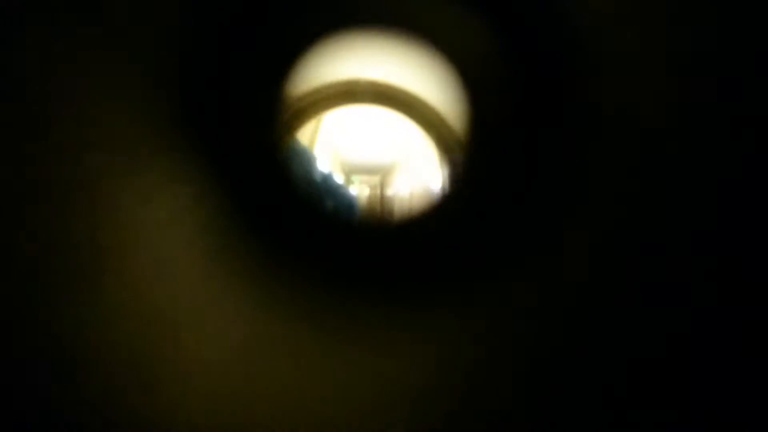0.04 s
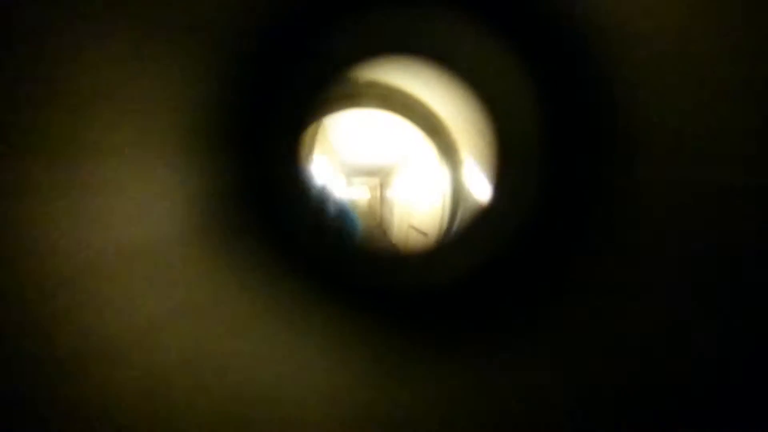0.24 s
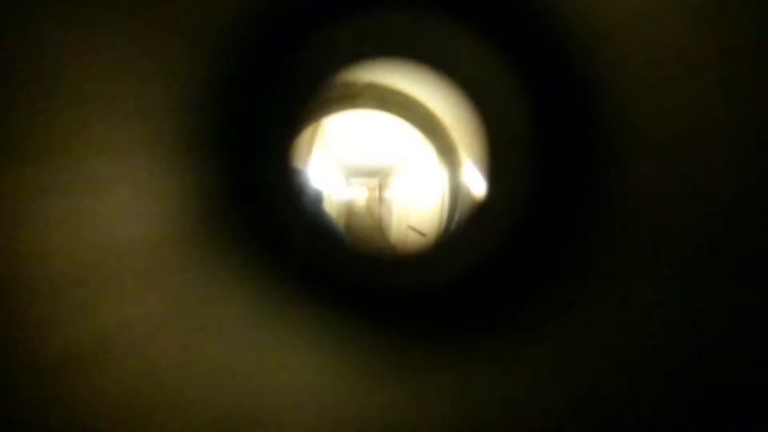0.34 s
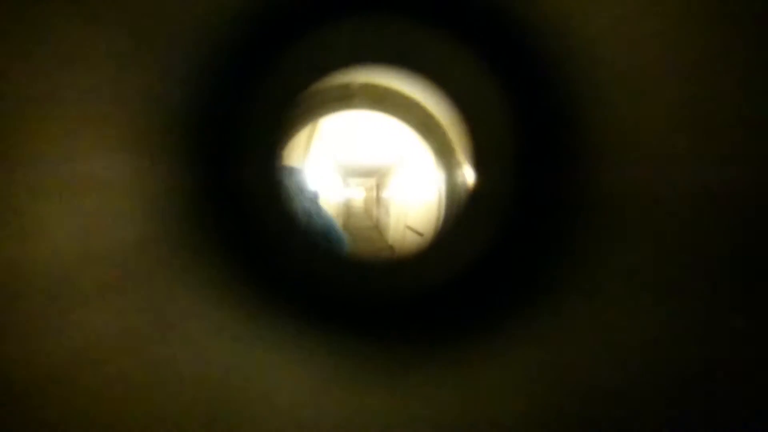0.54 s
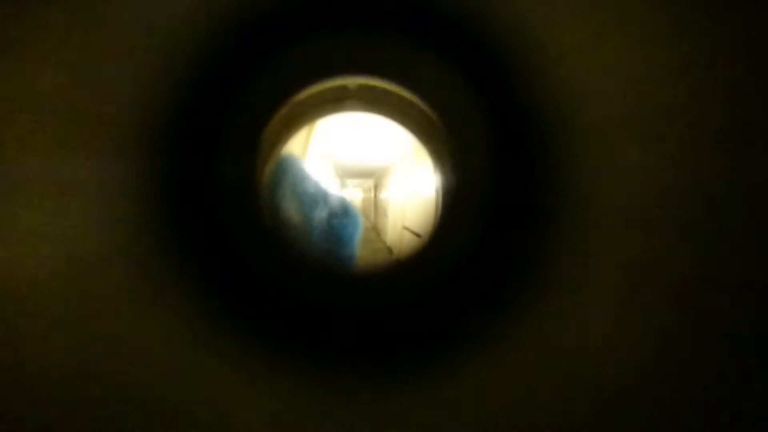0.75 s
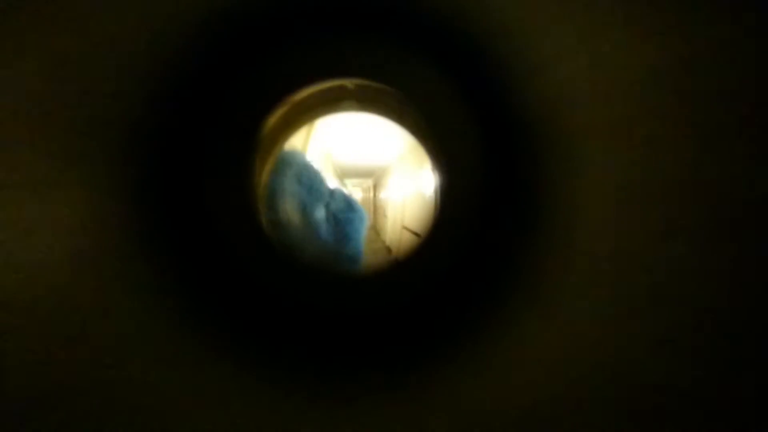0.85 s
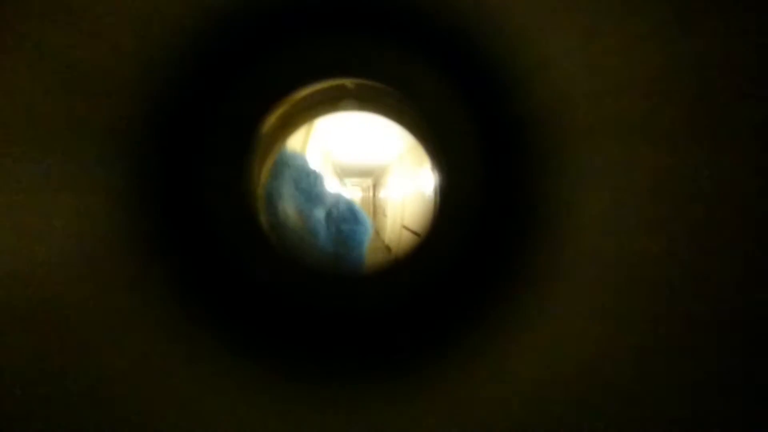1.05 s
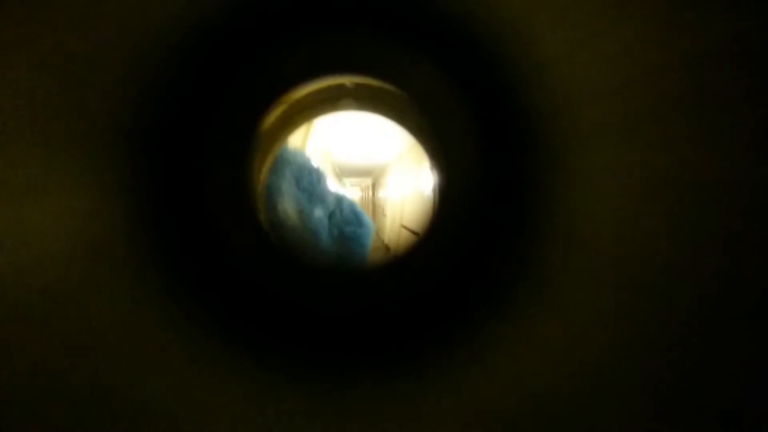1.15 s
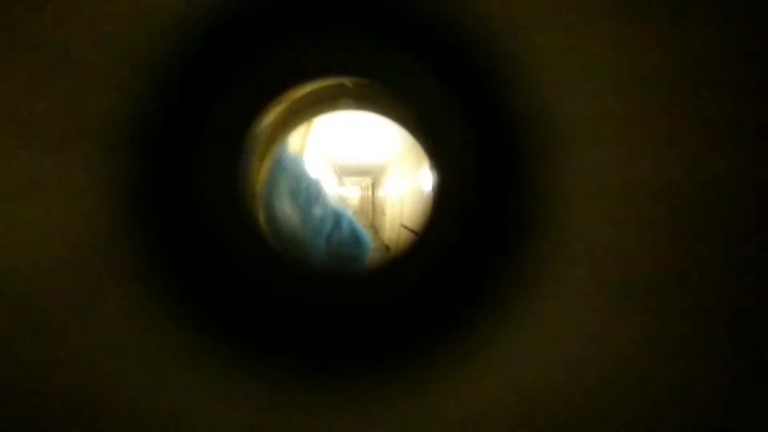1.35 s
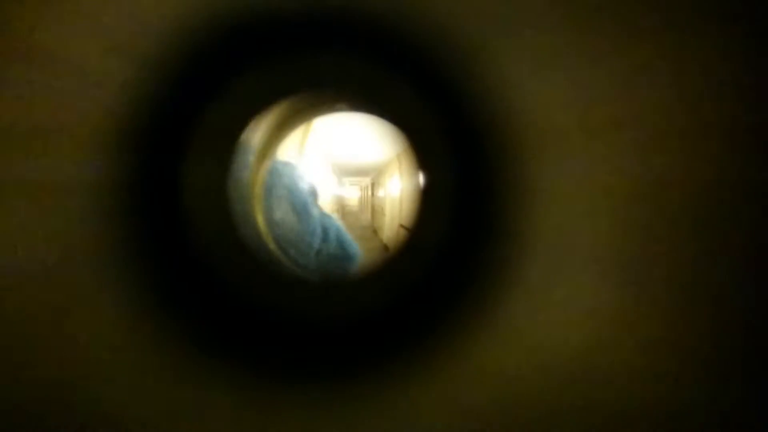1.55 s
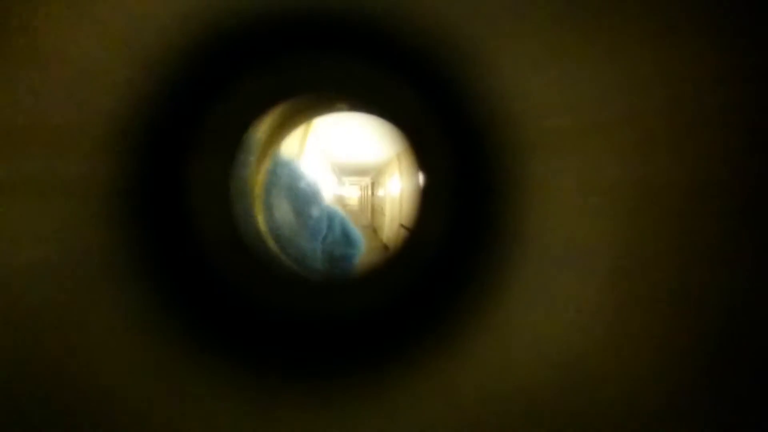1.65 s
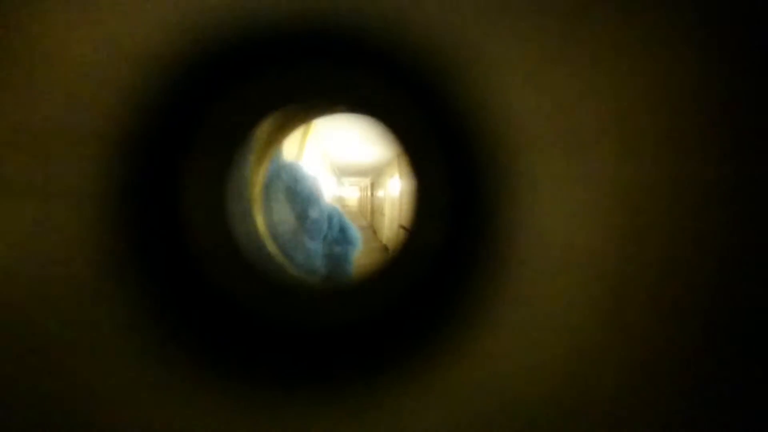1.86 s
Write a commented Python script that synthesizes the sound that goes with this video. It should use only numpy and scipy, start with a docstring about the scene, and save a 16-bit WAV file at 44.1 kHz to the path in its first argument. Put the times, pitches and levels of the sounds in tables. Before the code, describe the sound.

Two heavy bangs hit a hotel room door from the corridor, about a second apart, rattling the latch and overloading a microphone held against the wood. Dull rubbing comes first; soft knocks and a brief scrape fall between.

```python
"""Hotel room door, a phone held against the peephole. It rubs on the wood; light knocks thud at its left port.
Two heavy bangs from the corridor pump the air, ring the door panel and set the latch rattling; they
overload the microphone and die away in the corridor. After the first, the door slaps back into the phone.
Between the bangs something scrapes briefly on the door, over low rumble and a faint hiss."""
import sys
import numpy as np
from scipy import signal
from scipy.fft import rfft, irfft
from scipy.io import wavfile

SR = 44100
rng = np.random.default_rng(int(sys.argv[2]) if len(sys.argv) > 2 else 0)


def dump_mix(stems):
    """Bounce the given channels to the path in sys.argv[1] as a 16-bit WAV at rate SR."""
    frames = np.atleast_2d(stems).T  # one column per channel
    limited = np.clip(frames, -1, 1)  # hard clip at full scale
    pcm = np.round(limited * 32767).astype(np.int16)
    wavfile.write(sys.argv[1], SR, pcm)


N = 83790

# bangs: start_s, air_db, panel_db, crash_db, crash_t60_s, boom_db, treble_db, fittings_db
BANGS = [(0.3641, 2, -2.5, -5, 0.15, -17, -33, -43), (1.5257, -4, -11.5, -8.5, 0.17, -26, -37, -62)]
# spectrum of latch crack and corridor treble: freq_hz, density_db
TREBLE = [(500, -0.5), (1200, -26.5), (1900, -5), (2800, 7), (4000, 6.5), (5500, 10.5), (6400, 1),
          (7500, -22.5), (10000, -35.5), (16000, -36.5)]
SLACK_S = 0.0068  # door crosses its play before hitting the frame
THUD_RISE_S = 0.001
CORRIDOR_RISE_S, TREBLE_T60_S = 0.005, 0.44


def undb(db):
    """Decibels to gain."""
    return 10 ** (np.asarray(db) / 20)


def pan(db):
    """Stereo gains, left minus right = db."""
    return undb(np.array([[db], [-db]]) / 2)


def since(start_s):
    """Seconds since start_s, zero before."""
    return np.maximum(np.arange(N) / SR - start_s, 0)


def burst(start_s, rise_s, t60_s, hold_s=0):
    """Envelope: attack, hold, exponential release."""
    return (1 - np.exp(-since(start_s) / rise_s)) * 1000 ** (-since(start_s + hold_s) / t60_s)


def curve(points):
    """Gain along (time_s, level_db) points."""
    return undb(np.interp(since(0), *np.array(points).T))


def noise(spectrum, corr):
    """Unit-rms stereo noise shaped by (freq_hz, density_db), channel correlation corr."""
    hz, db = np.array(spectrum).T
    gain = undb(np.interp(np.log(np.fft.rfftfreq(N, 1 / SR) + 1), np.log(hz), db))
    mid, side = irfft(rfft(rng.standard_normal((2, N))) * gain, N)
    out = np.sqrt(1 + corr) * mid + np.sqrt(1 - corr) * side * np.array([[1], [-1]])
    return out / out.std()


def ring(start_s, modes):
    """Damped modes (freq_hz, level_db, t60_s) struck together."""
    age_s = since(start_s)
    return sum(undb(db) * np.sin(2 * np.pi * hz * age_s) * 1000 ** (-age_s / t60_s)
               for hz, db, t60_s in modes)


def thud(start_s, hz, t60_s):
    """One damped mode with a soft onset."""
    return np.sin(2 * np.pi * hz * since(start_s)) * burst(start_s, THUD_RISE_S, t60_s)


def lowpass(x, hz):
    """Sixth-order Butterworth low-pass."""
    return signal.sosfilt(signal.butter(6, hz, fs=SR, output="sos"), x)


def background():
    """Low room rumble; hiss that sinks and returns."""
    # spectra: freq_hz, density_db
    rumble_spectrum = [(15, 9), (35, -17), (60, 0), (120, -10), (240, -14.5), (400, -25.5), (700, -35),
                       (1500, -45.5), (4000, -47.5), (9000, -58), (16000, -56)]
    hiss_spectrum = [(300, 8.5), (800, 4), (1900, 2), (3000, 2.5), (4200, 3.5), (5400, 8.5), (6300, -1.5),
                     (7500, -13.5), (10000, -23), (16000, -41.5)]
    # hiss envelope: time_s, level_db
    hiss_level = [(0, -51.5), (.33, -53), (.6, -54), (.88, -53.5), (.95, -57.5), (1.2, -65), (1.5, -68),
                  (1.7, -61.5), (1.84, -53), (1.9, -54.5)]
    rumble = undb(-41.5) * noise(rumble_spectrum, corr=0.3) * pan(2.5)
    return rumble + curve(hiss_level) * noise(hiss_spectrum, corr=0.033) * pan(1.5)


def rub():
    """Dull friction of phone on door, at the left port."""
    # friction envelope: time_s, level_db
    level = [(0, -33.5), (.035, -27.5), (.075, -32), (.115, -68), (.16, -52.5), (.195, -29), (.215, -30.5),
             (.275, -34), (.295, -47), (.36, -39.5), (.4, -105)]
    # friction spectrum: freq_hz, density_db
    spectrum = [(60, -18), (140, -3), (235, 3), (330, -9.5), (450, -13.5), (620, -12), (850, -24.5),
                (1600, -26.5), (3000, -49.5), (8000, -65.5)]
    return curve(level) * noise(spectrum, corr=0) * undb([[0], [-22]])


def scrape():
    """Dense random slips excite small bright resonances over dry grit."""
    # scrape envelope: time_s, level_db
    level = [(1.027, -68), (1.032, -45.5), (1.058, -45), (1.067, -37.5), (1.078, -42.5), (1.093, -39.5),
             (1.102, -59), (1.126, -49), (1.155, -75.5)]
    # resonances: freq_hz, level_db, t60_s
    modes = [(2580, -6.5, 0.018), (2720, -12.5, .007), (3430, -12.5, 0.0081), (3740, -10.5, .008),
             (4800, -1.5, 0.01), (5036, -1.5, .009), (5750, -5.5, 0.0055), (6235, -9.5, 0.0058)]
    # grit spectrum: freq_hz, density_db
    grit_spectrum = [(500, -29.5), (1100, -8.5), (2000, -7), (2600, -2), (4800, 3.5), (6300, -3),
                     (7500, -12), (10000, -26), (14000, -37.5)]
    slips = rng.standard_normal((2, N))
    response = sum((-1) ** k * ring(0, [mode]) for k, mode in enumerate(modes))
    body = signal.fftconvolve(slips, np.gradient(response)[None], axes=1)[:, :N]
    grit = undb(-4.5) * noise(grit_spectrum, corr=0.1)
    return curve(level) * (body / body.std() + grit) * pan(8)


def knocks():
    """Soft taps, each with a short hollow ring, close to the left port."""
    # light knocks: start_s, tap_db, ring_db, ring_hz, ring_t60_s
    hits = [(0.2040, -9.5, -4, 239, .07), (0.2170, -37, -8.5, 240, 0.023), (0.2350, -40.5, -8, 230, 0.08),
            (0.266, -34, -20.5, 194, 0.068), (0.492, -25, -13, 222, 0.08),
            (0.8554, -29.5, -25.5, 200, 0.076), (0.873, -24, -20, 128, 0.045),
            (0.977, -12.5, -21.5, 277, 0.059), (1.4652, -20.5, -25, 166, 0.015),
            (1.4942, -17.5, -25.5, 190, .025), (1.4999, -19.5, -28, 189.5, .025)]
    tap_hz, tap_t60_s = 525, 0.0073
    out = np.zeros(N)
    for start_s, tap_db, ring_db, hz, t60_s in hits:
        out -= undb(ring_db) * thud(start_s, hz, t60_s) + ring(start_s, [(tap_hz, tap_db, tap_t60_s)])
    out = signal.sosfilt(signal.butter(2, 68, "high", fs=SR, output="sos"), out)
    return lowpass(out, hz=727) * undb([[0], [-44]])


def slaps():
    """Door rebounds into the phone: heavy thud and short smack at the left port."""
    # contacts: start_s, thud_db, thud_hz, thud_t60_s, smack_db
    hits = [(0.4135, 13.5, 131.5, .022, -10), (0.4200, 11, 212.6, 0.046, -8)]
    # smack spectrum: freq_hz, density_db
    smack_spectrum = [(300, -2), (1000, 0.5), (2200, -1), (3200, -11), (6000, -17.5), (9000, -28),
                      (16000, -31)]
    smack = noise(smack_spectrum, corr=0)
    out = np.zeros((2, N))
    for start_s, thud_db, hz, t60_s, smack_db in hits:
        out -= undb(thud_db) * thud(start_s, hz, t60_s)
        out += undb(smack_db) * smack * burst(start_s, THUD_RISE_S, t60_s=0.026)
    return out * undb([[0], [-24]])


def latch():
    """Bolt clacks in its plate: short metal modes, a crack, a faint room tail."""
    # clacks: start_s, ring_db, crack_db, pitch_ratio, t60_ratio
    clacks = [(0.3701, -2.5, -6.5, 1.22, 0.51), (0.385, -3.5, -10, 1.04, 0.58),
              (0.401, -16, -16.5, 1.5, 0.69), (0.6445, -14, -21, 1.05, 0.34),
              (0.915, -39.5, -37.5, 0.87, 0.84), (0.977, -40, -53, .87, 0.95), (1.533, -8, -5.5, 1.1, 0.86),
              (1.54, -5, -10.5, 0.88, 1.34), (1.553, -16, -24, 0.88, 1.0), (1.5951, -9, -17, 1.026, 0.86)]
    # latch modes: freq_hz, level_db, t60_s
    modes = [(2780, -19, .035), (2930, -18, .035), (3560, -20, .035), (3900, -16, .04), (4040, -7, .05),
             (4620, -17, .03), (4860, -6, .028), (5150, -16, .03), (5415, -10, .03), (5900, -16, .02)]
    rise_s, right_lag_s = 0.00083, 0.00023
    crack, room = noise(TREBLE, corr=0.033), noise(TREBLE, corr=0)
    out = np.zeros((2, N))
    for start_s, ring_db, crack_db, pitch_ratio, t60_ratio in clacks:
        metal = np.zeros(N)
        for hz, db, t60_s in modes:
            phase = 2 * np.pi * hz * pitch_ratio * since(start_s) + rng.uniform(0, 2 * np.pi)
            metal += undb(db) * np.sin(phase) * burst(start_s, rise_s, t60_s * t60_ratio)
        right = np.interp(since(0) - right_lag_s, since(0), metal)
        direct = undb(ring_db) * lowpass(np.array([metal, right]), hz=7560)
        direct += undb(crack_db) * crack * burst(start_s, rise_s, t60_s=0.03)
        tail = undb(ring_db - 33) * room * burst(start_s, CORRIDOR_RISE_S, TREBLE_T60_S)
        out += direct * pan(9.5) + tail
    return out


def corridor(k, hit_s, boom_db, treble_db):
    """Reverberation of bang k: low boom and bright tail."""
    # boom spectra: freq_hz, first_bang_db, second_bang_db
    boom_spectra = [(50, -12, -7), (78, -17, -9), (104, 0, 7), (160, -2.5, -4), (235, -3.5, -10.5),
                    (400, -8, -9.5), (690, -15, -14), (1200, -20, -19), (1790, -28.5, -18),
                    (4000, -57, -47.5)]
    # boom decay per bang: t60_s
    boom_t60_s = [0.55, 0.49]
    spectrum = [(hz, dbs[k]) for hz, *dbs in boom_spectra]
    boom = burst(hit_s, CORRIDOR_RISE_S, boom_t60_s[k]) * noise(spectrum, corr=0.2)
    treble = burst(hit_s, CORRIDOR_RISE_S, TREBLE_T60_S) * noise(TREBLE, corr=0.05)
    return undb(boom_db) * boom + undb(treble_db) * treble * pan(9)


def pumped_air(start_s, hit_s):
    """Door shoves the air and rocks in its frame; a draught flows round it."""
    # draught spectrum: freq_hz, density_db
    spectrum = [(12, 1.5), (25, 3.5), (50, -3.5), (75, -21), (150, -30.5), (400, -74.5)]
    push_s, sway_lag_s = 0.009, 0.0115
    sway_hz, sway_db, sway_t60_s = 23.8, -4.5, 0.48
    push = -undb(-3.5) * np.sin(np.pi * np.minimum(since(start_s) / push_s, 1)) ** 2
    sway = ring(start_s + sway_lag_s, [(sway_hz, sway_db, sway_t60_s)])
    draught = undb(-12.5) * burst(hit_s, rise_s=0.028, t60_s=1.194) * noise(spectrum, corr=0.081)
    return push + sway * pan(-11.5) + draught * pan(-4.5)


def door_ring(k, hit_s, panel_db, fittings_db):
    """Panel and metal fittings ring; each bang strikes a different spot on the panel."""
    # panel modes: freq_hz, first_bang_db, second_bang_db, t60_s
    panel_modes = [(101.7, -11, -5, 0.42), (115.4, -13, -7, 0.23), (163, -23.5, -9.5, 0.12),
                   (189, -14.5, -19, 0.6), (230.5, -21.5, -15.5, .3), (253, -17, -12, 0.41),
                   (351.8, -6.5, -14, 0.25), (485.6, -24, -29, 0.13), (514, -28.5, -45, .2),
                   (569, -20.5, -23, 0.19), (696, -17, -9.5, 0.19), (836, -20.5, -36, 0.27),
                   (890, -22, -16.5, .17), (1100, -15, -22, .17)]
    # fitting modes: freq_hz, level_db, t60_s
    fitting_modes = [(362, -4.5, 1.9), (228.3, -0.5, 1.6), (440, -11.5, .7)]
    right_lag_s = 0.0005
    modes = [(hz, dbs[k], t60_s) for hz, *dbs, t60_s in panel_modes]
    panel = np.array([ring(hit_s, modes), ring(hit_s + right_lag_s, modes)])
    return undb(panel_db) * panel * pan(3) + undb(fittings_db) * ring(hit_s, fitting_modes) * pan(19)


def frame_crash(start_s, hit_s, t60_s):
    """Door creaks through its play, then hits the frame."""
    # crash spectrum: freq_hz, density_db
    spectrum = [(150, 11.5), (400, 1.5), (900, 3), (1400, -1), (1900, -7), (2800, -3.5), (4000, -3),
                (5500, 3), (6400, -4.5), (7500, -15), (10000, -36.5), (16000, -48)]
    creak = undb(-2.5) * burst(start_s, rise_s=0.006, t60_s=0.057)
    impact = burst(hit_s, rise_s=0.00023, t60_s=t60_s, hold_s=0.004)
    return (creak + impact) * noise(spectrum, corr=0.19) * pan(1.5)


def bangs():
    """Each bang pumps the air, rings the door, slams it on its frame and fills the corridor."""
    out = np.zeros((2, N))
    for k, bang in enumerate(BANGS):
        start_s, air_db, panel_db, crash_db, crash_t60_s, boom_db, treble_db, fittings_db = bang
        hit_s = start_s + SLACK_S
        out += undb(air_db) * pumped_air(start_s, hit_s)
        out += door_ring(k, hit_s, panel_db, fittings_db)
        out += undb(crash_db) * frame_crash(start_s, hit_s, crash_t60_s)
        out += corridor(k, hit_s, boom_db, treble_db)
    return out


def scene():
    """Sum at the two ports."""
    return bangs() + slaps() + latch() + knocks() + rub() + scrape() + background()


def record(dry):
    """Microphone overload flattens the peaks; a steep low-pass cuts the top."""
    ceiling, knee, top_hz = 0.7, 6.1, 15950
    clipped = dry / (1 + np.abs(dry / ceiling) ** knee) ** (1 / knee)
    return signal.sosfilt(signal.ellip(10, 0.2, 80, top_hz, fs=SR, output="sos"), clipped)


dry = scene()
out = record(dry)
dump_mix(out)
```